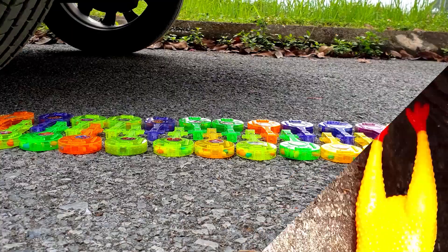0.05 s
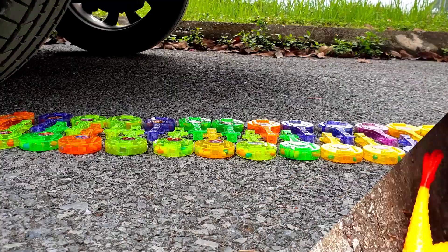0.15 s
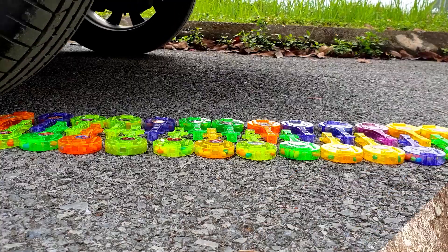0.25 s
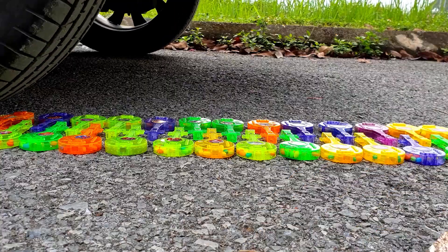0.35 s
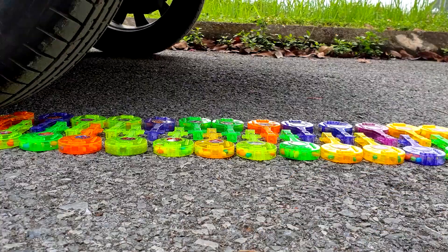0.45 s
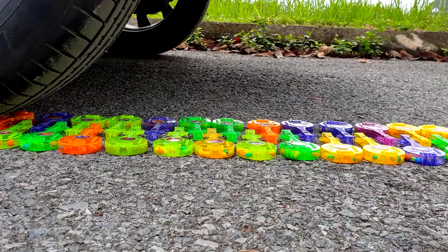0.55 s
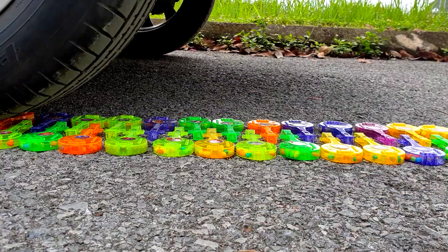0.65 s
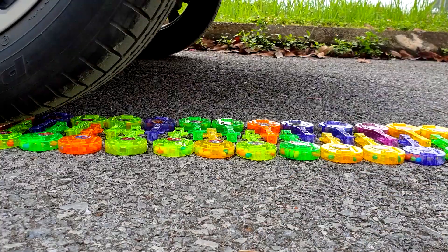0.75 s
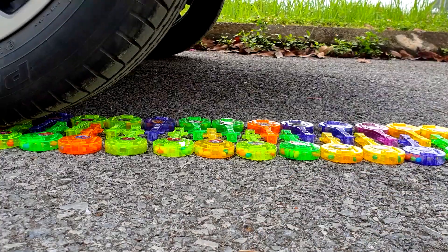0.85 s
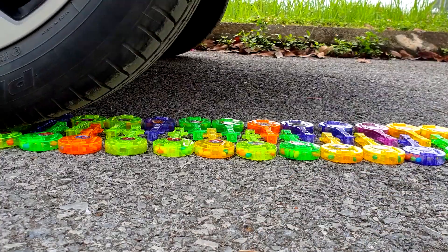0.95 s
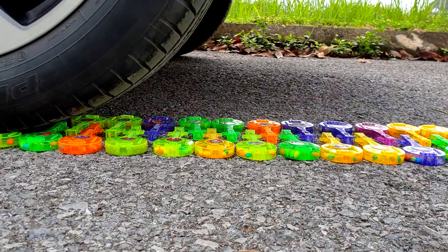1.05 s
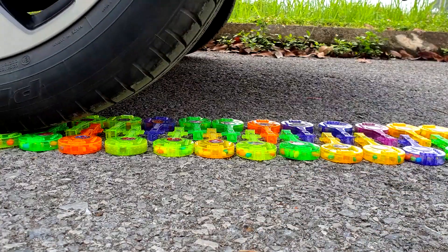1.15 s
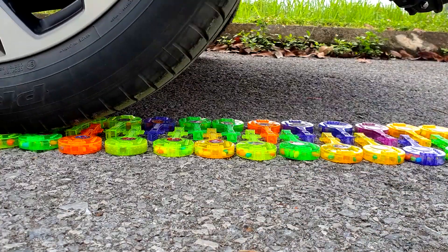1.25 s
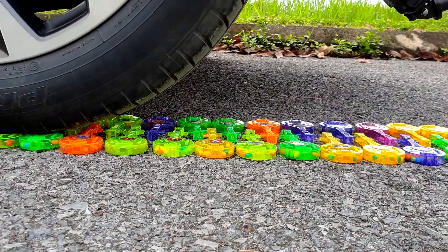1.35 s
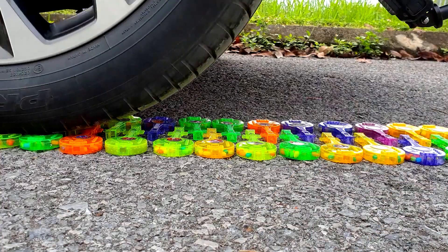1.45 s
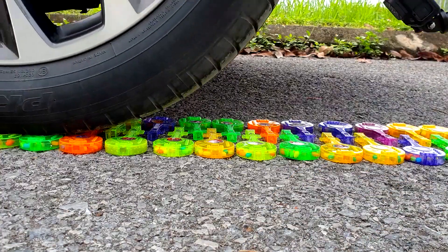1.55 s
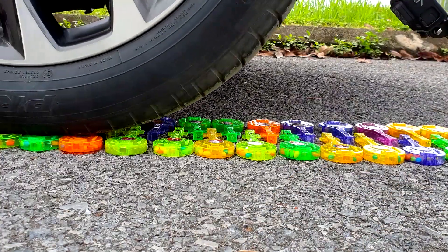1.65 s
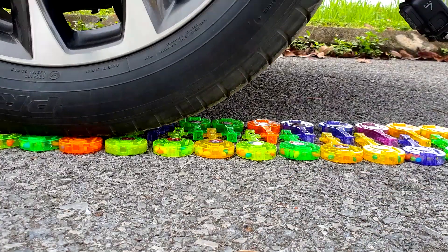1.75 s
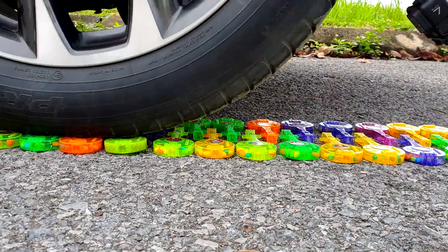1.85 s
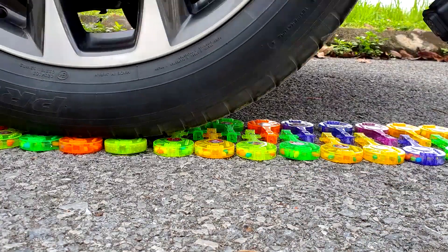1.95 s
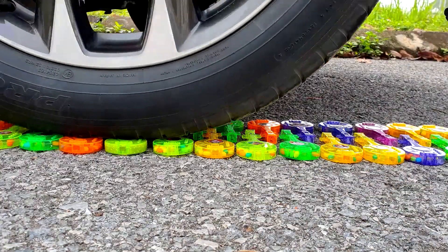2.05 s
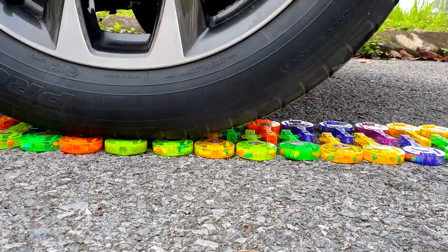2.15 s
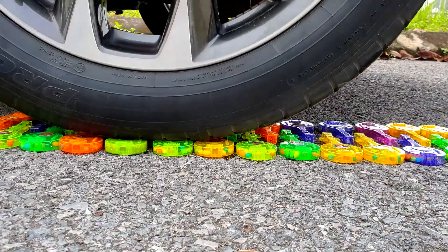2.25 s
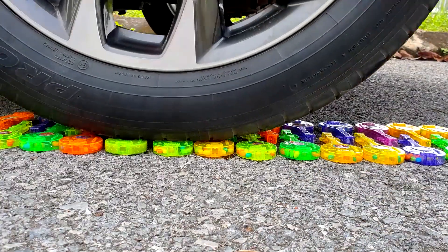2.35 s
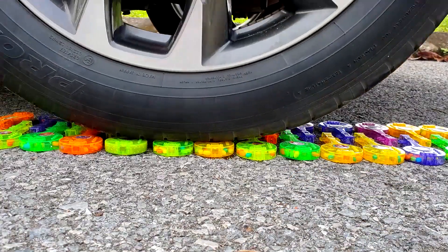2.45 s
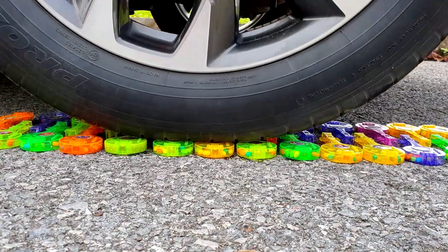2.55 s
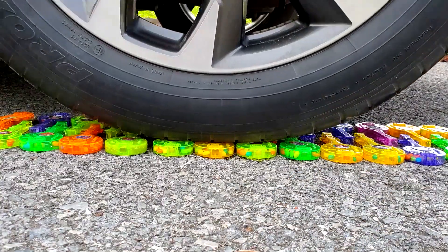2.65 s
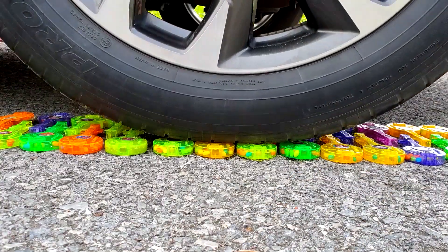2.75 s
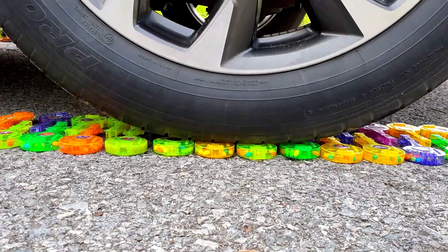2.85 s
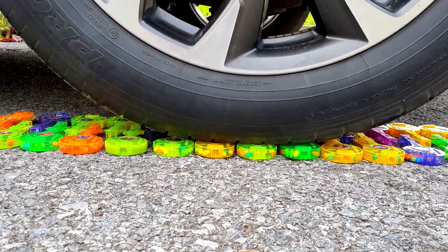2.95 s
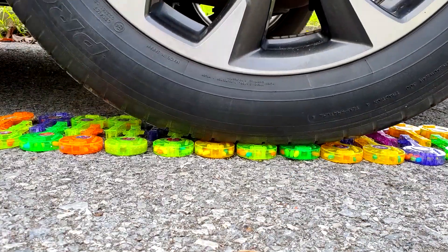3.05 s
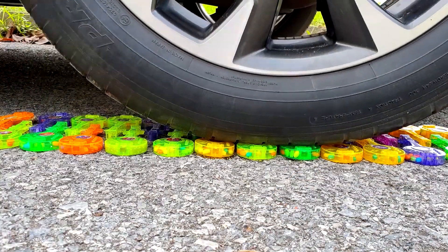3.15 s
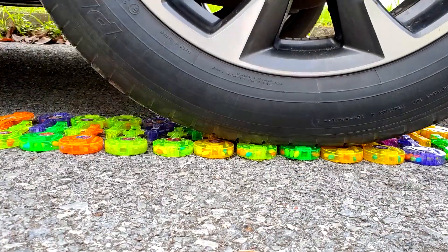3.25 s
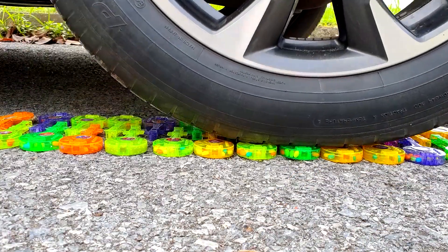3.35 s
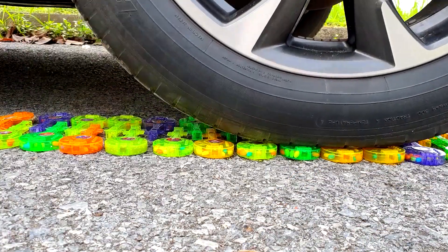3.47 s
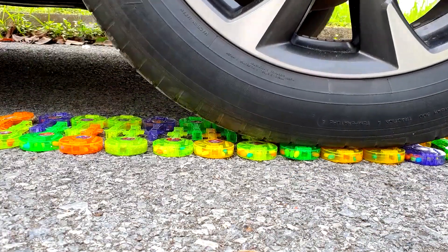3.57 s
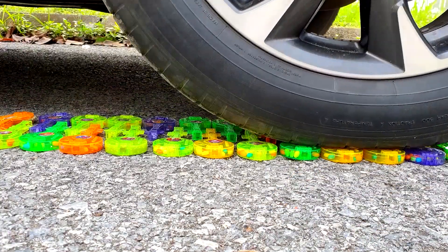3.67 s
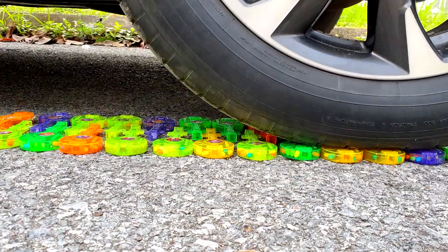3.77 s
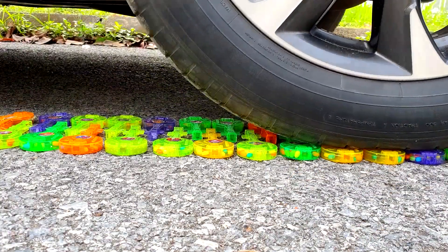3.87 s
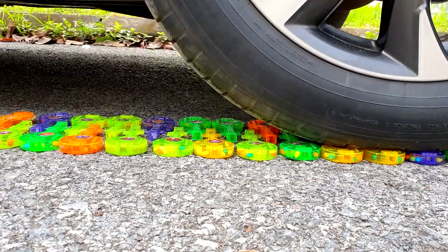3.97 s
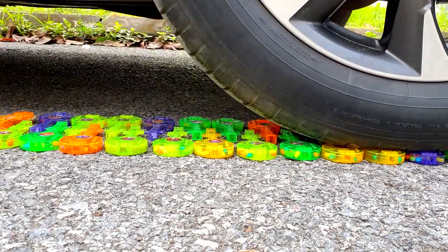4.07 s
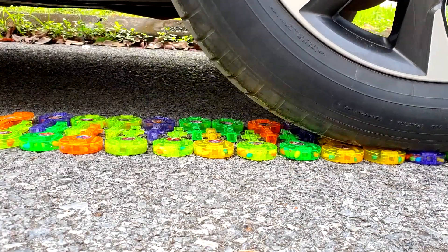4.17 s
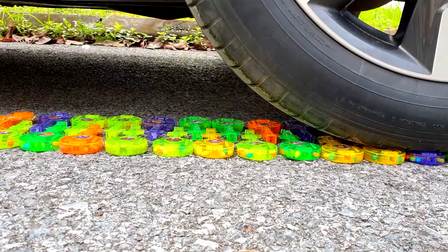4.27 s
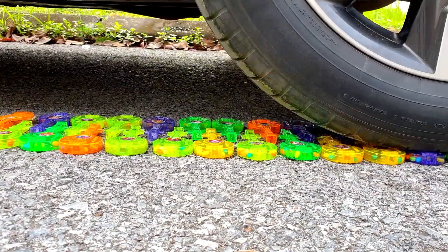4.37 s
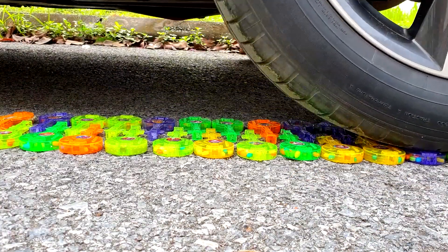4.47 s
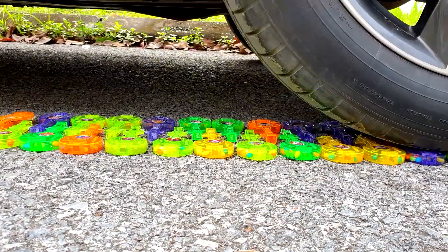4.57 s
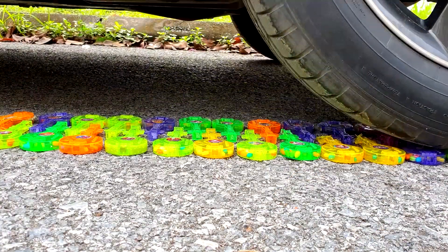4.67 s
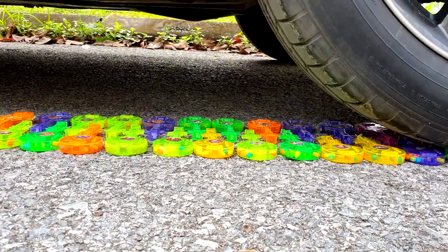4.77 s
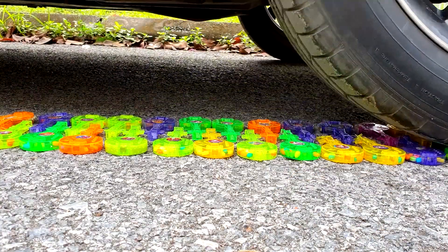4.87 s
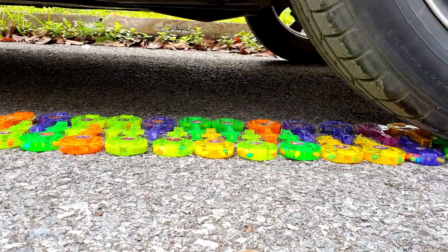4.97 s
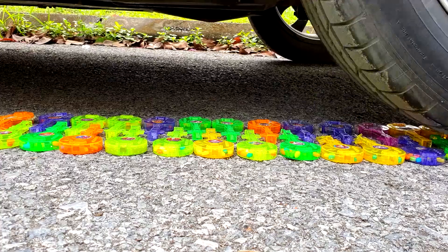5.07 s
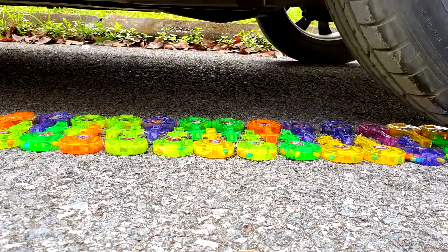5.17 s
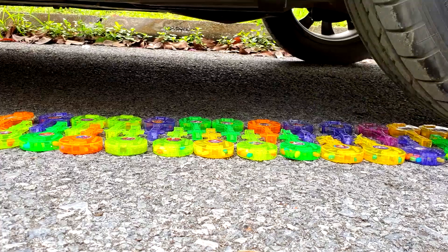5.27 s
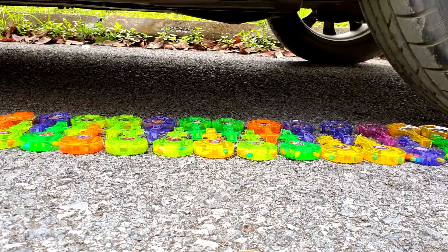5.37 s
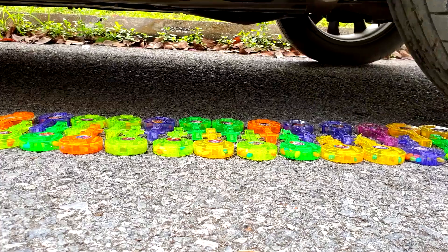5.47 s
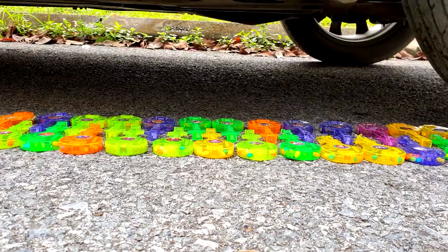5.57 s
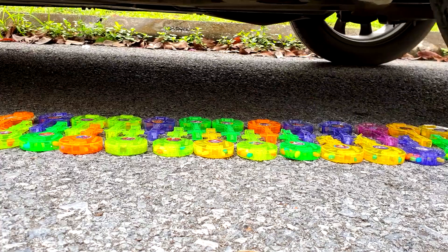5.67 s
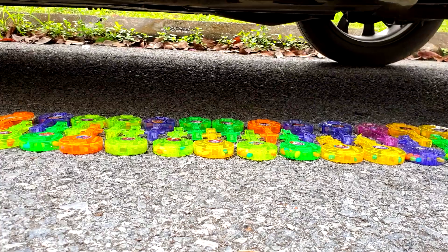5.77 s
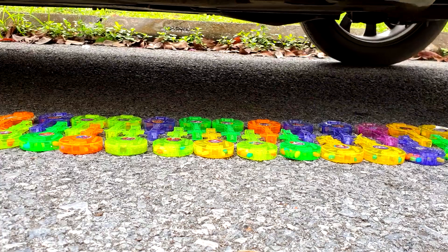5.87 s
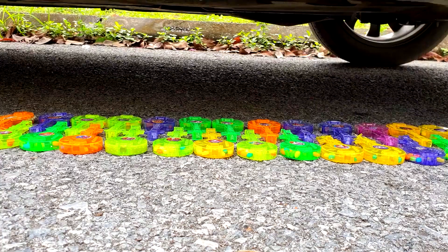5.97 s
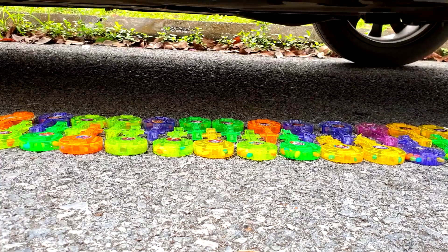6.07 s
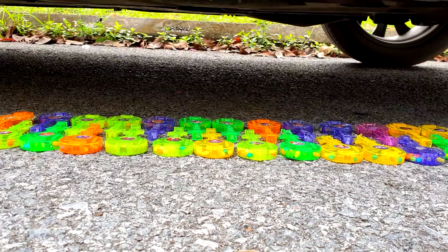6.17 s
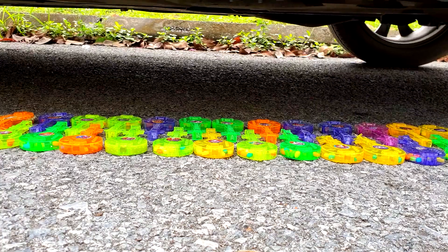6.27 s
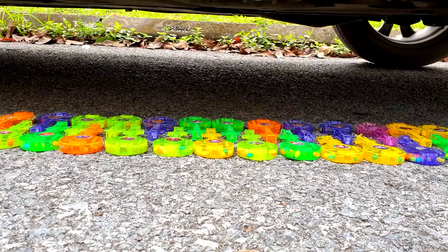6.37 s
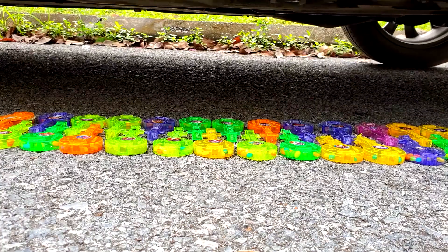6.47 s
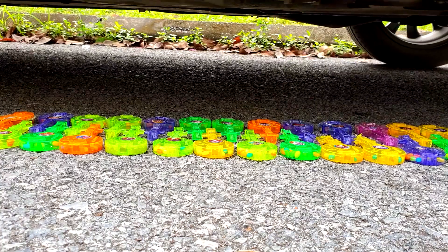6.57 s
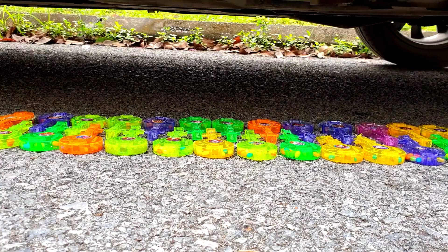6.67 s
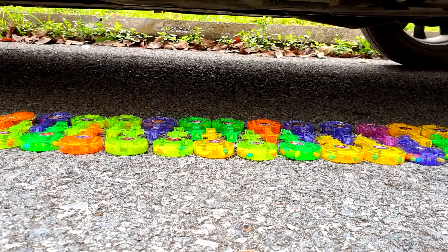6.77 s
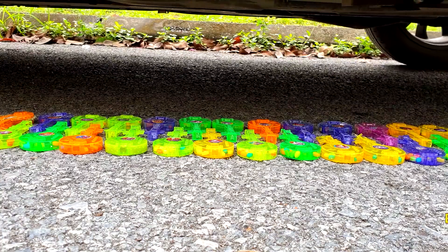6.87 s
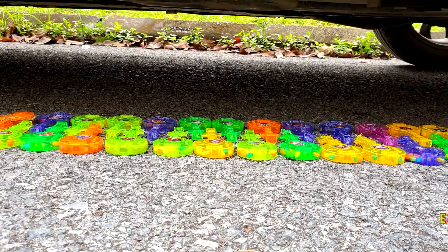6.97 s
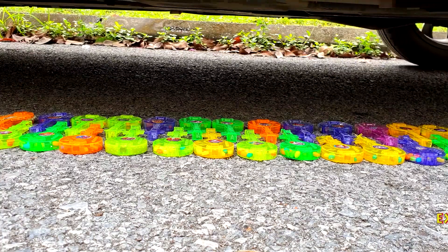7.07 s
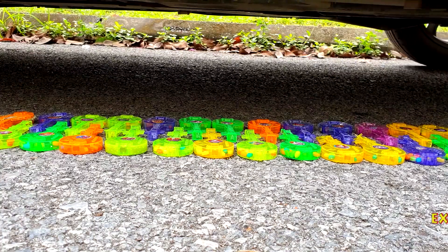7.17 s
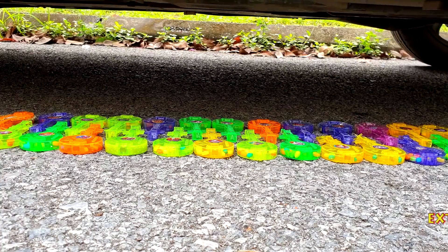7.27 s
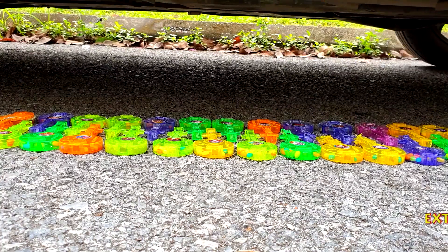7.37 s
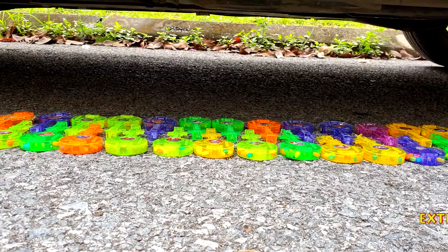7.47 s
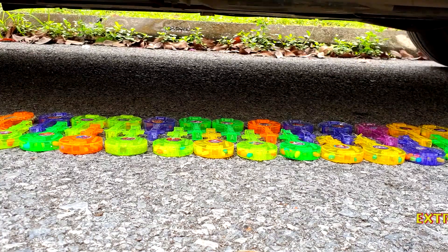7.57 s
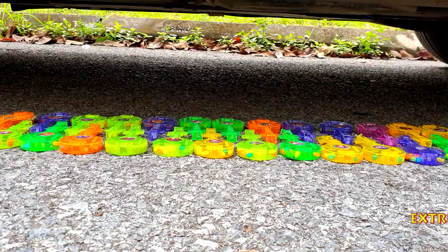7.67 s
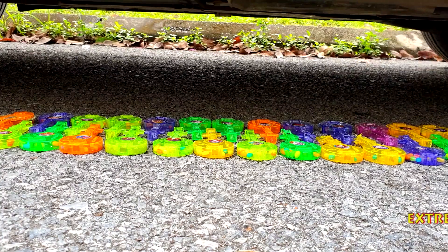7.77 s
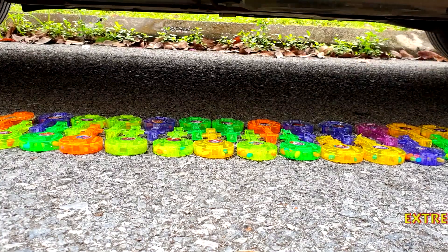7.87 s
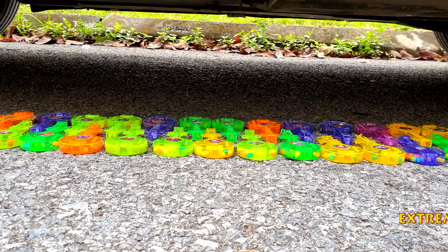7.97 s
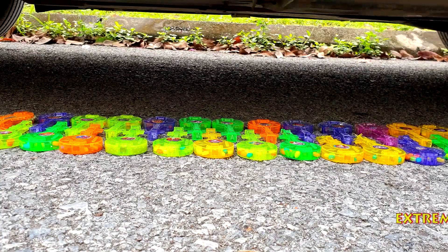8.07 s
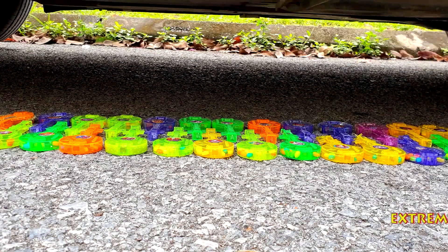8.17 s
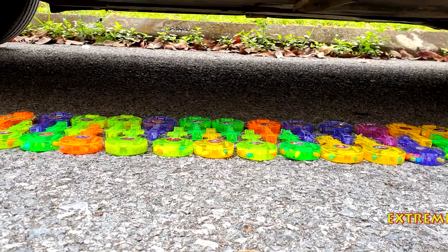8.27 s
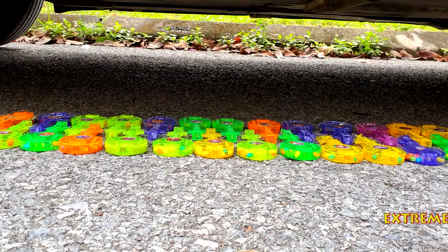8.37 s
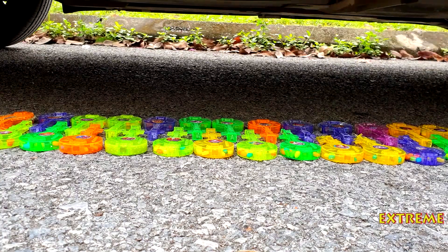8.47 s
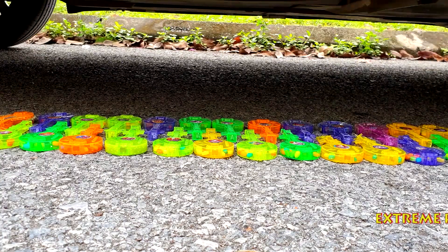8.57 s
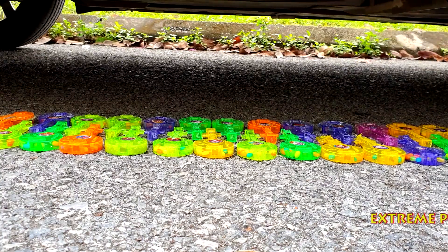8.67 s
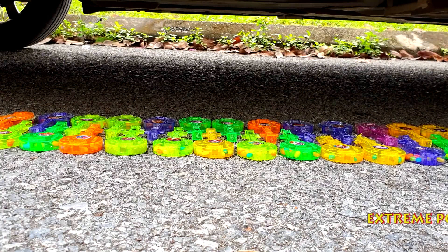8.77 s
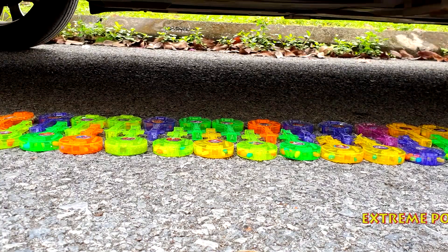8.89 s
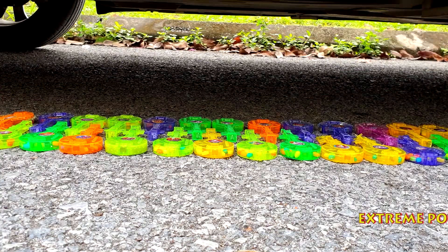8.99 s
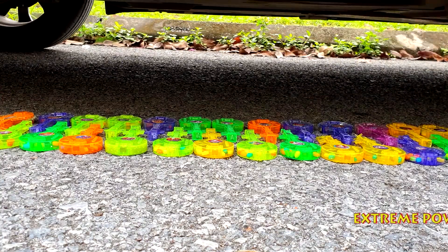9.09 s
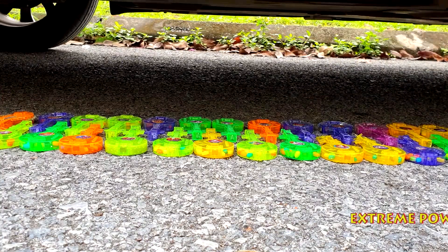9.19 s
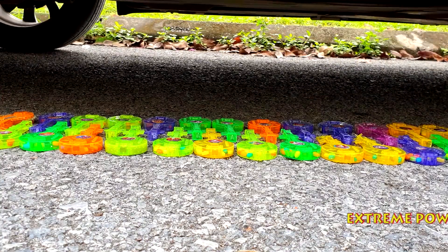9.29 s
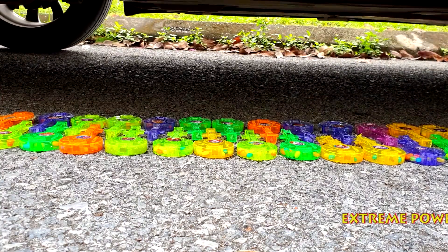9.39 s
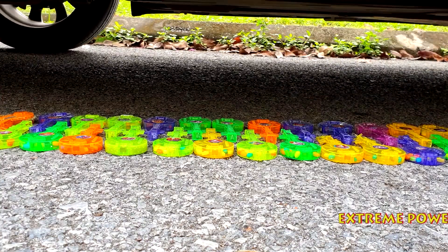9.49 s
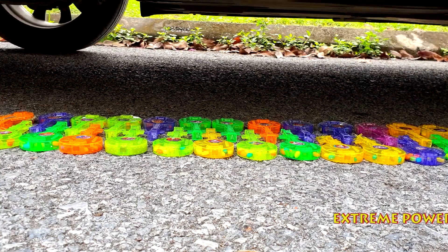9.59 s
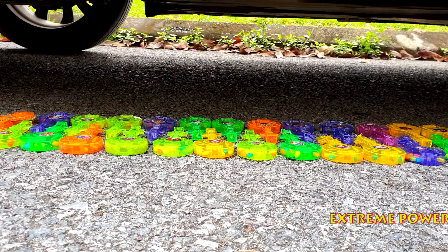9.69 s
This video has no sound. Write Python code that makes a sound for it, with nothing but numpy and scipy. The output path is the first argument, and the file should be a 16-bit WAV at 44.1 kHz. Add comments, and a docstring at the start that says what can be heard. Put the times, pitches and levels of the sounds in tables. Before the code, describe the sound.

Outdoors on asphalt, very close microphone: a low throbbing engine is suddenly covered by bright, dry plastic cracks and crackling as a tyre crushes toys. Breaks come thickest at first, thin slightly, then return with heavier hollow knocks, moving from left to right. After nearly six seconds the crunching stops; a quiet engine putters and ticks, with tiny clicks and faint rubbing whines.

```python
"""An idling engine gives way to snaps, hollow knocks and crunching right beside the microphone.
A car creeps over a row of hollow plastic toys on asphalt: each shell snaps as a burst of jerky noise, and
the tread drops on it as a damped tone; splinters crunch as coloured clicks between the breaks.
The biggest drops ring the air in the tyre, a decaying low tone. The engine, pulses and noise at the firing
rate, sinks under the crunch, then putters and ticks on past flicked bits and faint whines."""
import sys
import numpy as np
from scipy import signal
from scipy.io import wavfile
from scipy.ndimage import uniform_filter1d

SR = 44100
rng = np.random.default_rng(int(sys.argv[2]) if len(sys.argv) > 2 else 0)


def log_audio(samples):
    """Write samples as a 16-bit WAV file to the path given in sys.argv[1]."""
    # one column per channel
    frames = np.atleast_2d(samples).T
    # limit to full scale, then quantise
    limited = np.clip(frames, -1, 1)
    pcm = np.round(limited * 32767).astype(np.int16)
    wavfile.write(sys.argv[1], SR, pcm)


N = 429093
TIME = np.arange(N) / SR
FIRING_HZ = 18.4  # mean rate
CONTACT_START_S, CONTACT_END_S = .62, 5.7  # the tyre is on the toys

# the loudest shells giving way: start_s [s], snap_peak_db [dB], treble_db [dB, share of treble], knock_db [dB]
LOUD_BREAKS = [(0.6516, -10, -20.5, -40), (0.6835, -6.5, -17, -39), (0.7016, -8.5, -13.5, -36.5),
               (0.7215, -5, -14.5, -39), (0.731, -7, -10, -31), (0.7475, 1, -11.5, -25.5),
               (0.7835, 1, -11, -23.5), (0.8565, -4.5, -15.5, -16), (0.8846, -5, -8, -11.5),
               (0.8939, -6.5, -16.5, -16.5), (0.935, -1, -8.5, -26.5), (0.9776, -9.5, -7.5, -35),
               (0.9961, -1.5, -11, -25), (1.0388, -3.5, -9.5, -37), (1.1586, -11, -7, -49.5),
               (1.1916, -8, -9.5, -49), (1.2426, -5.5, -7, -36.5), (1.267, -6, -10, -25),
               (1.2821, -5.5, -11, -18), (1.3501, 1, -11.5, -21), (1.3956, -4.5, -11, -18),
               (1.4571, -5.5, -11, -30), (1.5426, -7.5, -4.5, -31), (1.5625, -6, -16.5, -25),
               (1.71, -5.5, -12.5, -20.5), (1.8255, -13, -7.5, -27), (1.8444, -3.5, -8.5, -23),
               (1.8814, -0.5, -12.5, -18.5), (1.9066, -10, -14, -34), (1.9945, -11.5, -2, -31.5),
               (2.0386, -5, -10, -10.5), (2.0858, -13, -11, -24.5), (2.1197, -9.5, -8.5, -23.5),
               (2.1792, -12, -10, -34), (2.1873, -12, -11.5, -25.5), (2.2506, -8, -4, -58.5),
               (2.372, -5, -6.5, -30), (2.579, -8.5, -8.5, -32.5), (2.827, -9, -16, -16),
               (2.966, -10.5, -16.5, -58.5), (2.9742, -14.5, -13, -27), (3.0616, -6, -11.5, -33),
               (3.0749, -10, -12.5, -20.5), (3.1494, -17.5, -6.5, -29), (3.1918, -4.5, -10.5, -22),
               (3.2787, -4, -12.5, -13), (3.2932, 2.5, -7, -10), (3.3224, -12.5, -13, -11),
               (3.4053, -6, -12.5, -16.5), (3.476, 2, -11, -6), (3.5359, -5.5, -9.5, -25.5),
               (3.5478, -11.5, -2, -25), (3.6203, -14.5, -8.5, -36), (3.7231, -7.5, -4, -28),
               (3.744, -6.5, -6.5, -21.5), (3.7949, -6.5, -7.5, -26.5), (3.8079, -8.5, -11.5, -17),
               (3.8266, -10.5, -6, -16), (3.8392, -2.5, -13, -4.5), (3.8976, -8.5, -11.5, -34),
               (3.9444, -12, -9, -18), (3.9626, -6.5, -10.5, -13), (3.9837, -4.5, -11.5, -8),
               (4.0038, -9, -10.5, -25.5), (4.1274, -16, -1.5, -22), (4.1608, -3, -10, -17),
               (4.2233, -7, -8.5, -42), (4.2845, -13, -12.5, -31), (4.3088, -5, -22, -28.5),
               (4.4298, -9, -8.5, -26.5), (4.459, -17, 3, -33), (4.5246, -14.5, -10.5, -39.5),
               (4.5735, -10.5, -3, -51), (4.6249, -14.5, -11.5, -45), (4.793, -11, -9, -48),
               (4.8709, -9.5, -12, -25), (4.9424, -5.5, -15, -11), (5.0179, -4, -15, -10),
               (5.0453, -15.5, -19.5, -20), (5.0983, -6, -18.5, -8), (5.1067, -7.5, -9.5, -20),
               (5.1442, -9.5, -9, -13.5), (5.1541, -14.5, -14, -15.5), (5.296, -13.5, -7, -41),
               (5.3247, -10, -11.5, -50), (5.4346, -9, -9.5, -44), (5.4853, -10, -9.5, -40),
               (5.5031, -11, -6, -45), (5.5215, -10, -14, -58)]
# relative spectrum of splintering plastic: frequency_hz [Hz], density_db [dB per Hz]
SPLINTER_SPECTRUM = [(100, -37), (300, -19.5), (680, -7.5), (1250, -23.5), (2400, -15), (3400, 2.5),
                     (4600, 2), (8200, -4.5), (10000, -2.5), (16000, -9)]
# where the toys break: time_s [s], left_ear_lag_ms [ms],
# facing [0-1, how far the wedge under the tread faces the microphone]
BREAK_PLACE = [(.75, -.23, 0.36), (1.3, -0.17, 0), (2.5, 0.056, 0), (3.8, 0.14, 0), (4.3, .25, 0.6),
               (4.7, 0.3, 0.52), (5.4, .31, 0.97)]


def gain_of(db):
    """Level to amplitude: 20 dB is a factor of ten."""
    return 10 ** (np.asarray(db) / 20)


def evened(x):
    """Power normalisation: scales to rms 1."""
    return x / np.sqrt(np.mean(x ** 2) + 1e-20)


def read(points, hz):
    """Interpolation on a log-frequency axis, as pitch is heard."""
    f, value = np.transpose(points)
    return np.interp(np.log(hz + 1), np.log(f + 1), value)


def follow(rows, t):
    """Linear interpolation of a curve's columns at the times t."""
    s, *columns = np.transpose(rows)
    return [np.interp(t, s, column) for column in columns]


def add(mix, s, sound):
    """Superposition: mixes a stereo sound in at s seconds."""
    part = mix[:, max(round(s * SR), 0):][:, :sound.shape[1]]
    part += sound[:, :part.shape[1]]


def colour(x, points, extra_db=0, size=2048):
    """Minimum-phase filtering: a causal filter with the given spectrum keeps the sharp front of clicks."""
    level_db = read(points, np.fft.rfftfreq(size, 1 / SR)) + extra_db
    log_gain = np.log(gain_of(np.maximum(level_db, -100)))
    circle = np.concatenate([log_gain, log_gain[-2:0:-1]])
    # the Hilbert transform of the log gain gives the minimum phase
    taps = np.fft.ifft(np.exp(signal.hilbert(circle).conj())).real[:size // 2]
    return signal.oaconvolve(x, taps[None], axes=1)[:, :x.shape[1]]


def pair(length, alike):
    """Partial coherence: two channels of noise share the fraction alike of their power."""
    shared = np.sqrt(alike) * rng.standard_normal(length)
    return shared + np.sqrt(1 - alike) * rng.standard_normal((2, length))


def shell_db(depth_db, size=2048, count=35):
    """Modal colouring: the random broad peaks and dips of one piece of plastic, depth_db rms."""
    ripple = uniform_filter1d(rng.standard_normal(size // 2 + 1), count)
    return depth_db * evened(uniform_filter1d(ripple, count // 3))


def placed(x, lag_ms):
    """Interaural delay: sound from one side reaches the far ear later; a positive lag delays the left."""
    at = np.arange(x.shape[1])
    lag = np.round(lag_ms * SR / 1000)
    return np.array([np.interp(at - np.maximum(side * lag, 0), at, channel, left=0)
                     for side, channel in zip((1, -1), x)])


def ring_at(x, hz, width):
    """Resonance: a bandpass of the given width, scaled to rms 1."""
    return evened(signal.lfilter(*signal.iirpeak(hz, hz / width, fs=SR), x))


def engine(throb=0.23):
    """Periodic excitation: four cylinders fire in turn, giving exhaust, bay drone, throbbing whirr and ticks."""
    # the engine at the microphone: time_s [s], exhaust_db [dB], whirr_db [dB]
    engine_levels = [(0, -31, -39), (.8, -32.5, -39.5), (1.05, -49, -64), (1.6, -55.5, -63),
                     (2.5, -62.5, -56), (3.3, -55, -58), (5.6, -57, -56), (6.1, -58.5, -62.5),
                     (6.6, -51.5, -62), (7.1, -46.5, -56.5), (7.7, -45.5, -57.5), (9.73, -45.5, -55.5)]
    # relative spectrum of the exhaust: frequency_hz [Hz], density_db [dB per Hz]
    exhaust_spectrum = [(15, -7), (32, -10), (54, 6), (72, -1), (95, -0.5), (135, -12), (185, -17),
                        (230, -25), (290, -12), (380, -20), (480, -20), (800, -63.5)]
    # relative spectrum of the mechanical whirr: frequency_hz [Hz], density_db [dB per Hz]
    whirr_spectrum = [(200, -4), (380, -11), (560, 2.5), (800, -10), (1100, -9), (1550, -6.5),
                      (2300, -10.5), (3200, -15), (4500, -18.5), (8000, -23.5), (9500, -21.5),
                      (12000, -25.5), (16000, -31)]
    # drone of the engine bay: pitch_hz [Hz], width_hz [Hz, the narrower of two cascaded filters], level_db [dB]
    bay_modes = [(192.3, 38, -40.5), (231, 165, -45.5), (375, 52, -39.5), (530, 33, -60)]
    exhaust_db, whirr_db = follow(engine_levels, TIME)
    # running count of firings, with a slow small wander in rate
    turns = np.cumsum(FIRING_HZ * (1 + .006 * np.sin(2 * np.pi * .6 * TIME))) / SR
    pulses = evened(np.diff(turns.astype(int), prepend=0))
    drive = pulses + pair(N, 0.92)
    exhaust = evened(colour(drive, exhaust_spectrum, size=16384))
    exhaust = exhaust * gain_of([[1], [-1]])  # 2 dB stronger on the left
    bay = sum(gain_of(db) * ring_at(ring_at(drive, hz, width), hz, 2 * width) for hz, width, db in bay_modes)
    throbbing = pair(N, 0.29) * (1 + throb * np.cos(2 * np.pi * turns))
    whirr = evened(colour(throbbing, whirr_spectrum))
    overhead = np.interp(TIME, [.75, 1], [1, 0])  # the bay passes overhead and its drone fades
    clear = np.interp(TIME, [5.7, 6.1], [.15, 1])  # the ticking comes forward once the wheel has rolled clear
    mechanics = whirr + clear * ticks(turns)
    return gain_of(exhaust_db) * exhaust + overhead * bay + gain_of(whirr_db) * mechanics


def ticks(turns, tick_db=-16, tick_s=0.0082, width_hz=450, tappet_db=-9, tappet_hz=1560, tappet_width_hz=200):
    """Impact excitation of resonances: once a firing a tappet clacks and an injector ticks at its own pitch."""
    # each cylinder's injector, in firing order: pitch_hz [Hz], level_db [dB, added to tick_db]
    injector_tones = [(9200, -1), (10300, -0.5), (9600, -3), (12600, -7.5)]
    firing, since_s = turns.astype(int), (turns % 1) / FIRING_HZ
    strength = gain_of(3.5 * rng.standard_normal(N)[firing])  # one random strength a firing
    taps = pair(N, 0.46) * np.exp(-since_s / tick_s) * strength
    clack = ring_at(ring_at(taps, tappet_hz, tappet_width_hz), tappet_hz, 2 * tappet_width_hz)
    out = gain_of(tappet_db) * clack
    for k, (hz, db) in enumerate(injector_tones):
        own = taps * (firing % len(injector_tones) == k)
        out += gain_of(db + tick_db) * ring_at(ring_at(own, hz, width_hz), hz, 4 * width_hz)
    return out


def held(start, length, attack_s=0.0055, release_db_per_s=423):
    """Attack, hold and exponential decay: a grind sets in quickly, holds, and dies away."""
    age = TIME - start
    return np.clip(age / attack_s, 0, 1) * gain_of(-release_db_per_s * np.clip(age - length, 0, .5))


def splintering(bed_db=-48, after_db=-25, after_db_per_s=240):
    """Addition of powers: a light crackle throughout contact, the grinds, and the decaying wake of each break."""
    # broken shells ground down under the tread: start_s [s], length_s [s], level_db [dB]
    grind_events = [(0.62, 0.081, -25.5), (0.778, 0.061, -31), (.94, .16, -30), (1.249, 0.039, -15.5),
                    (1.616, .13, -27.5), (1.893, 0.071, -30), (2.139, 0.026, -34), (2.32, .04, -35),
                    (2.47, 0.043, -31), (2.703, 0.021, -27), (2.931, 0.055, -30.5), (3.226, 0.062, -29.5),
                    (3.494, .07, -31.5), (3.823, 0.049, -25.5), (4.06, .06, -38), (4.313, 0.045, -29),
                    (4.754, .11, -33), (5.196, 0.17, -30.5), (5.488, 0.014, -22.5), (5.618, 0.069, -38)]
    power = (gain_of(bed_db) * held(CONTACT_START_S, CONTACT_END_S - CONTACT_START_S)) ** 2
    for start, length, db in grind_events:
        power += (gain_of(db) * held(start, length)) ** 2
    breaks = np.zeros(N)
    for s, peak_db, _, _ in LOUD_BREAKS:
        breaks[round(s * SR)] += gain_of(peak_db + after_db) ** 2
    wake = signal.lfilter([1], [1, -gain_of(-2 * after_db_per_s / SR)], breaks + 1e-20)
    return np.sqrt(power + wake)


def crunch(level, grain_s=0.0037, scrape=0.18, count=10):
    """Granular noise: many splinters snap, in differently coloured groups, over shards scraping on asphalt."""
    out, keep = np.zeros((2, N)), np.exp(-2 / (grain_s * SR))
    per_s, spread_db = 330, 9  # clicks from all groups together; mean of the exponential spread before its cap
    for _ in range(count):
        loudness = gain_of(spread_db * np.minimum(rng.exponential(1, N), 2.5))
        clicks = (rng.random(N) < per_s / count / SR) * loudness
        bursts = np.sqrt(signal.lfilter([1], [1, -keep], clicks ** 2 + 1e-12))
        out += colour(pair(N, .65) * bursts, SPLINTER_SPECTRUM, shell_db(5.5))
    # level the slow swells: the load sets how much breaks at a time
    out /= np.sqrt(uniform_filter1d((out ** 2).mean(0), SR // 8) + 1e-9)
    scrape_band = signal.butter(2, [3000, 5500], "band", fs=SR, output="sos")
    out += scrape * evened(signal.sosfilt(scrape_band, pair(N, 0.1806)))
    return placed(out * level, follow(BREAK_PLACE, TIME)[0])


def snap(bright_db, tear_s=0.00069, jerk=0.82, size=2048):
    """Brittle fracture: a tear swells and runs in jerks for about two milliseconds; the pieces rattle briefly."""
    # relative spectrum of a snap: frequency_hz [Hz], density_db [dB per Hz]
    snap_spectrum = [(100, -43), (500, -30), (1200, -16), (1800, -9), (2400, -9), (3300, -5.5), (4400, 1),
                     (5600, 1.5), (8200, -3), (9600, 1), (13000, -2), (16000, -5.5)]
    t, hz = np.arange(size) / SR, np.fft.rfftfreq(size, 1 / SR)
    jerks = np.exp(jerk * np.repeat(rng.standard_normal(size // 16), 16))
    age = t / (tear_s * rng.uniform(.6, 1.5))
    rattle = .1 * np.exp(-t / .011)
    tear = pair(size, 0.94) * (age * np.exp(1 - age) + rattle) * jerks
    tilt_db = bright_db * .5 * np.tanh(2 * np.log((hz + 1) / 7000))  # pivots at 7 kHz
    x = colour(tear, snap_spectrum, tilt_db + shell_db(3.12))
    return x / np.sqrt(np.mean(x[:, :220] ** 2))  # rms 1 over the first 5 ms


def knock(db, light_hz=720, heavy_hz=580, swell_s=0.00083, thud_share=0.012, size=2048):
    """Damped oscillation: the tread drops on the hollow toy, ringing deeper for the heaviest drops."""
    t = np.arange(size) / SR
    hz = np.interp(db, [-12, -5], [light_hz, heavy_hz]) * (1 + .06 * rng.standard_normal())
    x = t ** 2 * np.exp(-t / swell_s) * np.sin(2 * np.pi * hz * t)
    x = x / np.sqrt(np.mean(x[:220] ** 2))  # rms 1 over the first 5 ms
    thud = thud_share * np.exp(-t / 0.0078) * np.sin(2 * np.pi * hz * rng.uniform(0.43, 1.0) * t)
    return gain_of(db) * np.array([x + thud, x + thud])


def crack(s, snap_db, bright_db, knock_db, scatter_ms=.08):
    """Simultaneous sources: a snap and a knock at once, from where the tread meets the toys."""
    sound = gain_of(snap_db) * snap(bright_db) + knock(knock_db)
    return s, placed(sound, follow(BREAK_PLACE, s)[0] + scatter_ms * rng.standard_normal())


def cracks(crest_db=8, usual_treble_db=-12, tilt_per_db=2.5):
    """Crest factor and spectral tilt: big breaks' peaks set their rms, their treble share the brightness."""
    out = np.zeros((2, N))
    for s, peak_db, treble_db, knock_db in LOUD_BREAKS:
        bright_db = tilt_per_db * (treble_db - usual_treble_db)
        add(out, *crack(s, peak_db - crest_db, bright_db, knock_db))
    return out


def chips(level, clumping=.6, usual_db=-25, spread_db=2, bright_db=8, tint_db=8, knock_db=-14, count=60):
    """Random point process: smaller pieces break off more often where the splintering is strong."""
    last_break_s = 5.53  # after this the tread only lifts off the shards
    breaking = (TIME > CONTACT_START_S) * (TIME < last_break_s)
    out, chance = np.zeros((2, N)), np.cumsum(level ** clumping * breaking)
    # one draw in each equal share of the total chance
    draws = (np.arange(count) + rng.random(count)) / count
    times = np.interp(draws, chance / chance[-1], TIME)
    for s, (size, tint, hollow) in zip(times, rng.standard_normal((count, 3))):
        db = usual_db + spread_db * size
        add(out, *crack(s, db, bright_db + tint_db * tint, db + knock_db + spread_db * hollow))
    return out


def wedge(x, horn=2.03):
    """Horn loading: the gap between tread and road lifts the middle range when it faces the microphone."""
    middle = signal.sosfilt(signal.butter(1, [1300, 2200], "band", fs=SR, output="sos"), x)
    return x + horn * follow(BREAK_PLACE, TIME)[1] * middle


def underbody(x, wet_db=-11, echo_db=-17, count=12000):
    """Early reflections and reverberation: road, wheel arch and underbody return echoes and a short tail."""
    # decay between road and underbody: frequency_hz [Hz], t60_s [s]
    decay_times = [(200, 0.36), (700, 0.042), (1500, 0.15), (4000, 0.048), (9000, 0.032), (16000, 0.029)]
    # sparse random reflections, none in the first 3 ms
    taps = pair(count, 0.92) * (rng.random(count) < .12) * (np.arange(count) > .003 * SR)
    hz, t, z = signal.stft(taps, SR, nperseg=128)
    decay = gain_of(-60 * t / read(decay_times, hz)[:, None])
    tail = signal.istft(z * decay, SR, nperseg=128)[1]
    tail *= gain_of(wet_db) / np.linalg.norm(tail[0])
    wet = signal.oaconvolve(x, tail, axes=1)[:, :N]
    dull = signal.sosfilt(signal.butter(1, 2000, fs=SR, output="sos"), x)
    # echoes: delay_s [s], level_db [dB, added to echo_db]
    for delay_s, db in [(.0083, -11), (.0135, -9), (.0215, -16), (.031, -12.5)]:
        wet += gain_of(echo_db + db) * np.roll(dull, round(delay_s * SR), 1)
    return wet


def tyre_air(hz=195.0, t60=0.99):
    """Cavity resonance: the air inside the tyre hums after a heavy drop."""
    # heavy drops: start_s [s], level_db [dB]
    heavy_drops = [(3.477, -33), (3.844, -28), (5.03, -58.5)]
    out, t = np.zeros((2, N)), np.arange(SR) / SR
    hum = gain_of(-60 * t / t60) * np.sin(2 * np.pi * hz * t) * (1 - np.exp(-t / 0.002))
    for s, db in heavy_drops:
        add(out, s, gain_of(db) * np.array([hum, hum]))
    return out


def bits(fall_s=0.01, focus_db=22, size=2048):
    """Small-body radiation: loose pieces click on the road as decaying noise focused around a pitch."""
    # bits flicked by the tread: start_s [s], level_db [dB], pitch_hz [Hz]
    flicked = [(5.619, -40, 4680), (5.689, -50, 4110), (5.903, -55.5, 1977), (6.924, -56, 4576),
               (7.069, -56, 9600), (7.429, -54, 5340), (8.814, -58, 6400)]
    out, t, f = np.zeros((2, N)), np.arange(size) / SR, np.fft.rfftfreq(size, 1 / SR)
    for s, db, hz in flicked:
        octaves_off = np.minimum(abs(np.log2((f + 1) / hz)), 2)
        own_db = shell_db(7.5) - focus_db * octaves_off
        burst = pair(size, 0.13) * np.exp(-t / fall_s)
        add(out, s, gain_of(db) * evened(colour(burst, SPLINTER_SPECTRUM, own_db)))
    return out


def whines(width_hz=45, flutter_db=4):
    """Friction-excited resonance: rubbing parts sing faintly in narrow bands that come and go."""
    # whines as the car creeps on: start_s [s], length_s [s], pitch_hz [Hz], level_db [dB]
    rubbing = [(6.046, 0.65, 1516, -70), (6.798, .55, 539, -57.5), (7.045, 0.84, 1077, -62)]
    out = np.zeros((2, N))
    for s, length, hz, db in rubbing:
        noise = pair(round(length * SR), 0.87)
        count = noise.shape[1]
        wander = evened(uniform_filter1d(rng.standard_normal(count), SR // 25))
        tone = evened(ring_at(noise, hz, width_hz) * gain_of(flutter_db * wander))
        add(out, s, gain_of(db) * tone * signal.windows.tukey(count, .7))
    return out


def scene(lowest_hz=115):
    """Radiation and superposition: toys too small to radiate deep bass, and the engine to the left."""
    level = splintering()
    toys = wedge(cracks() + chips(level) + crunch(level)) + bits()
    toys = signal.sosfilt(signal.butter(2, lowest_hz, "high", fs=SR, output="sos"), toys)
    return toys + underbody(toys) + tyre_air() + placed(engine(), -.3) + whines()


def record(dry, edge_hz=16100):
    """Clipping and band limiting: peaks are cut at full scale, then a lowpass removes the top."""
    clipped = np.clip(dry, -1, 1)
    lowpass = signal.firwin(255, edge_hz, window=("kaiser", 7), fs=SR)
    return signal.oaconvolve(clipped, lowpass[None], "same")


dry = scene()
out = record(dry)
log_audio(out)
```